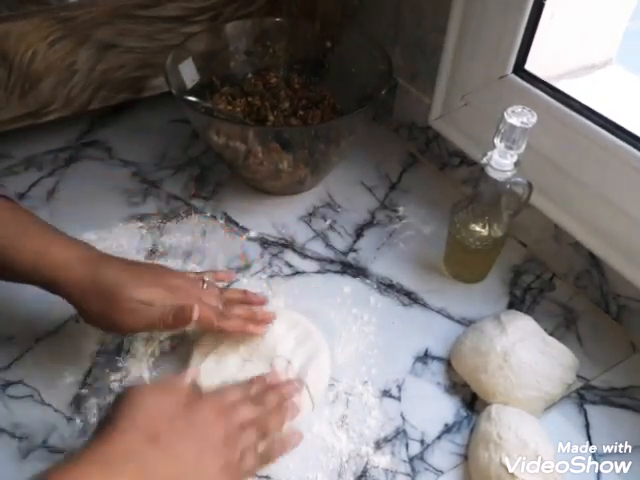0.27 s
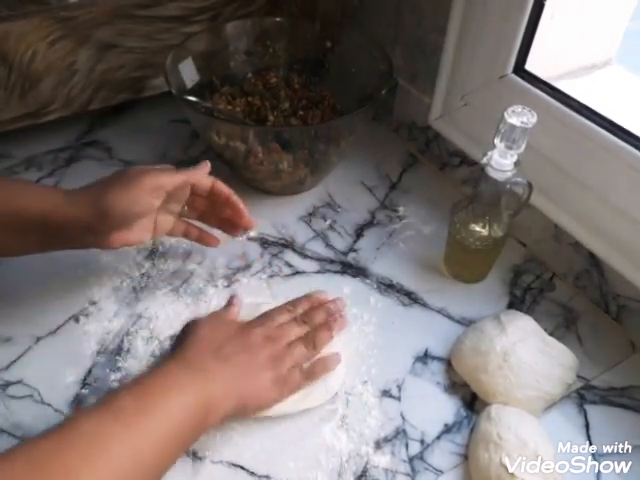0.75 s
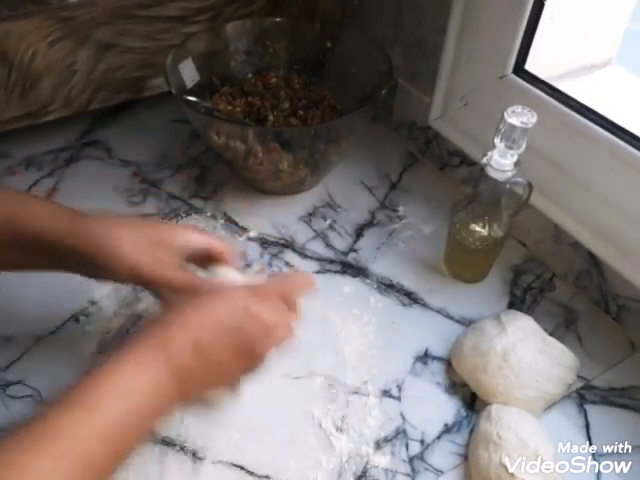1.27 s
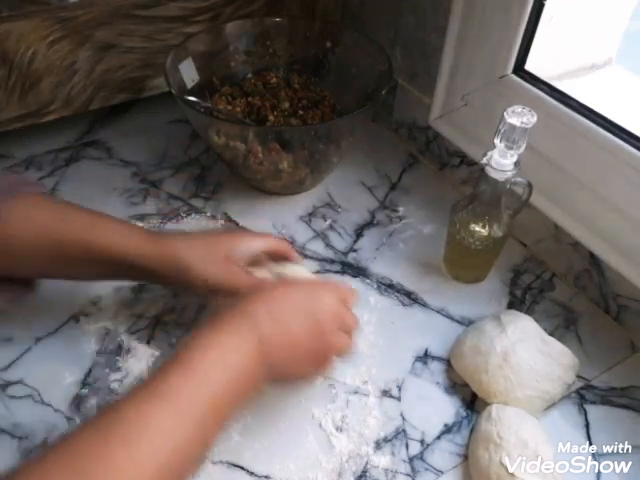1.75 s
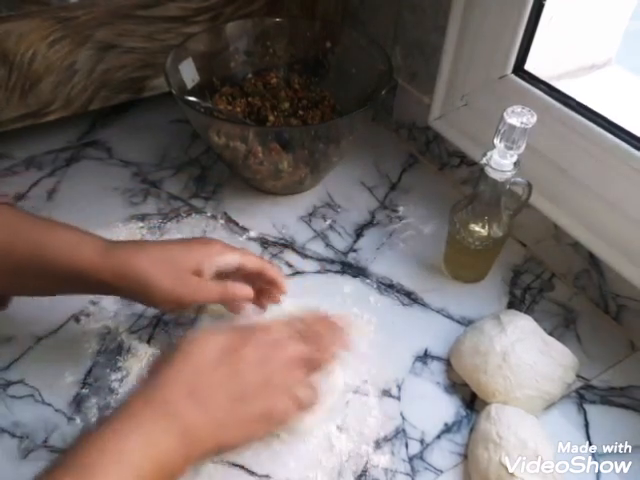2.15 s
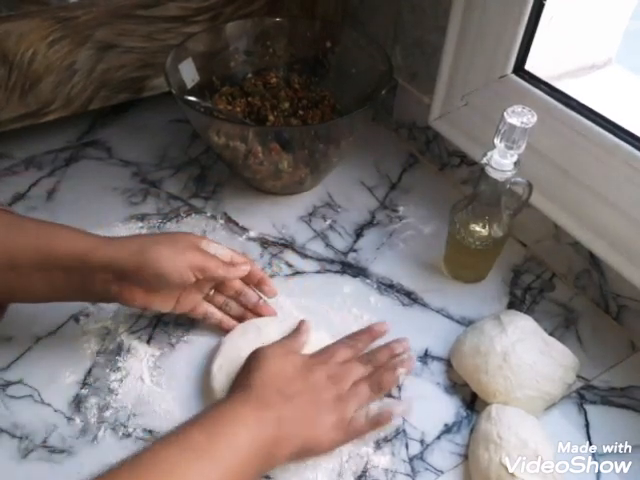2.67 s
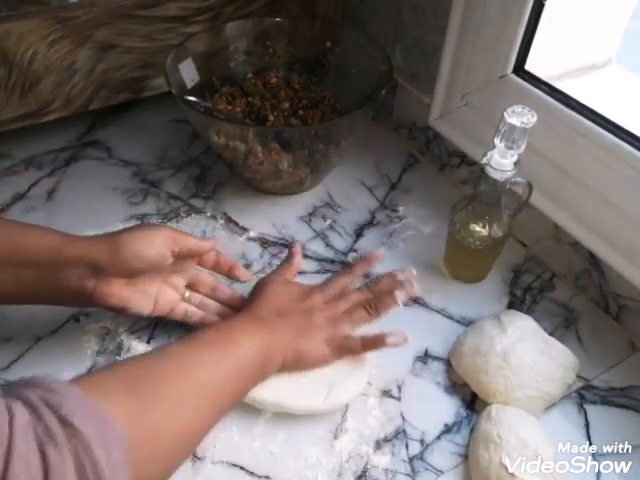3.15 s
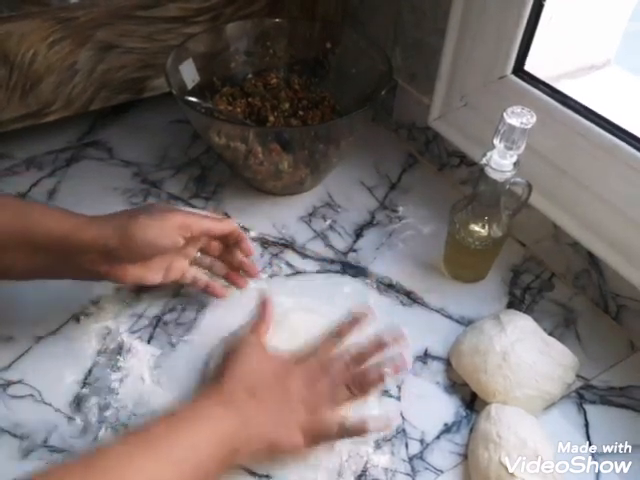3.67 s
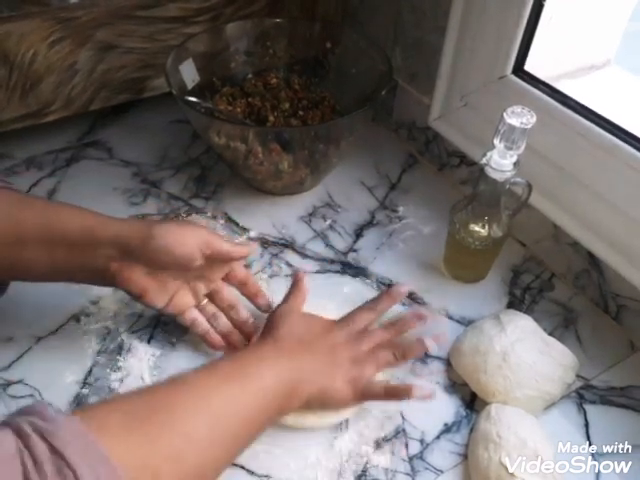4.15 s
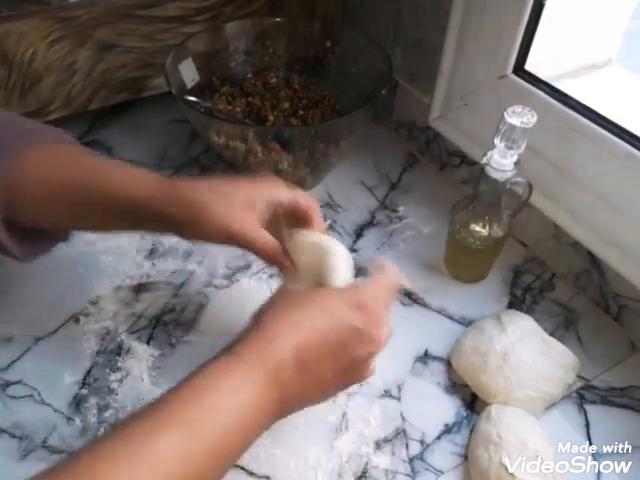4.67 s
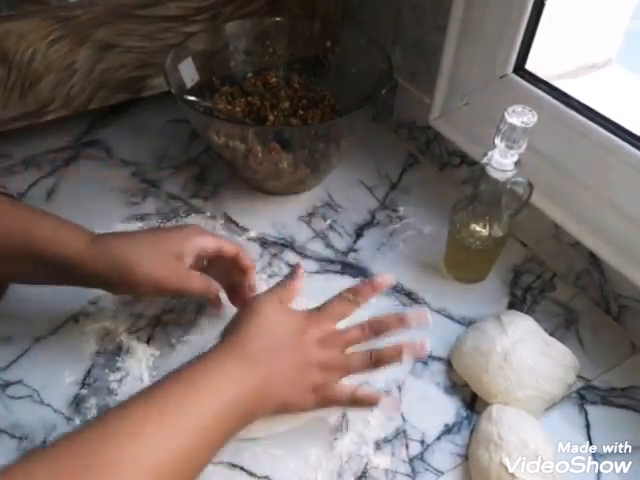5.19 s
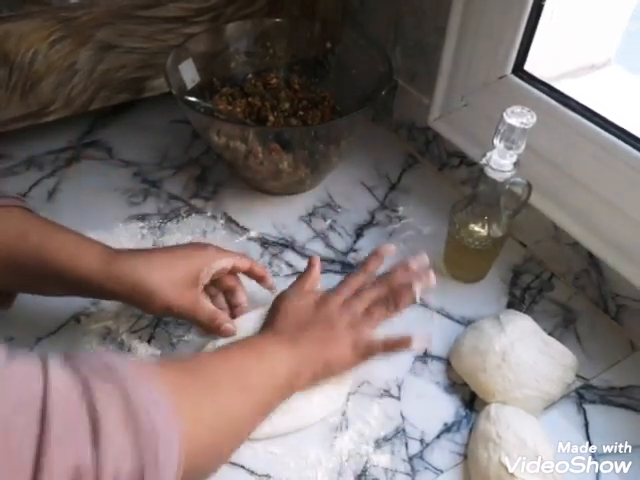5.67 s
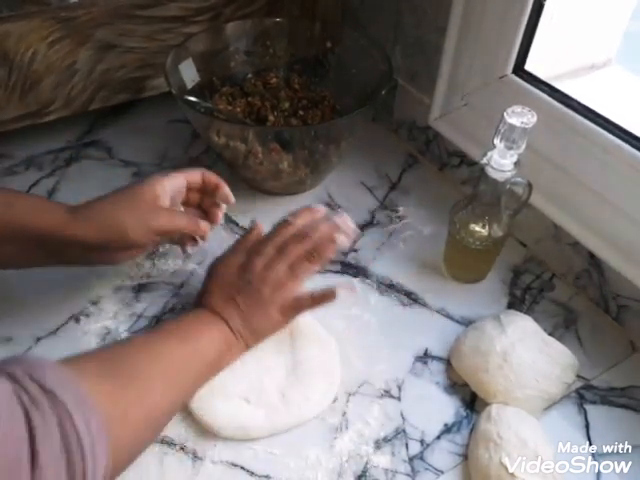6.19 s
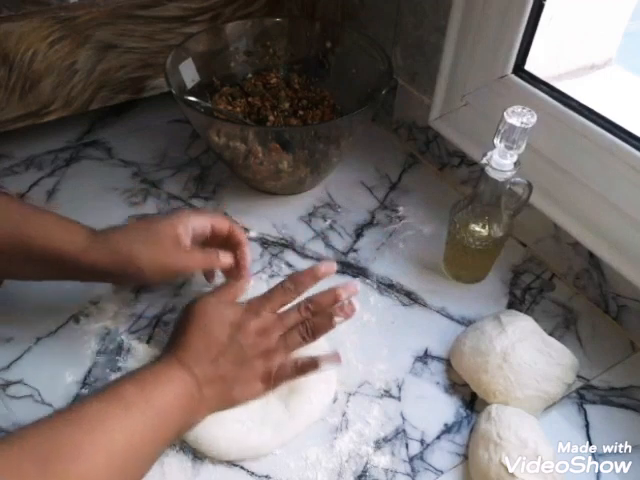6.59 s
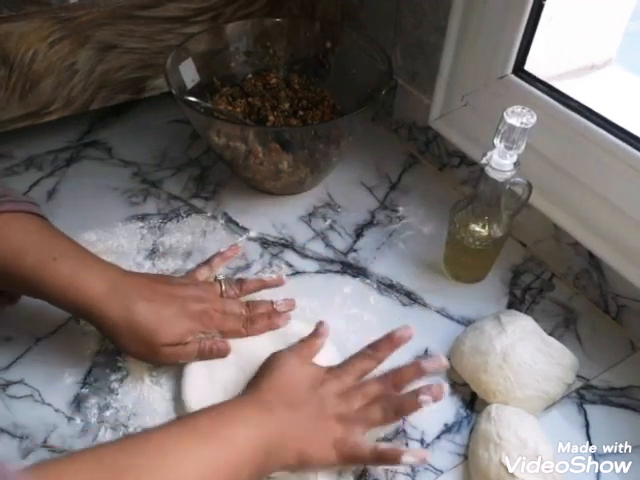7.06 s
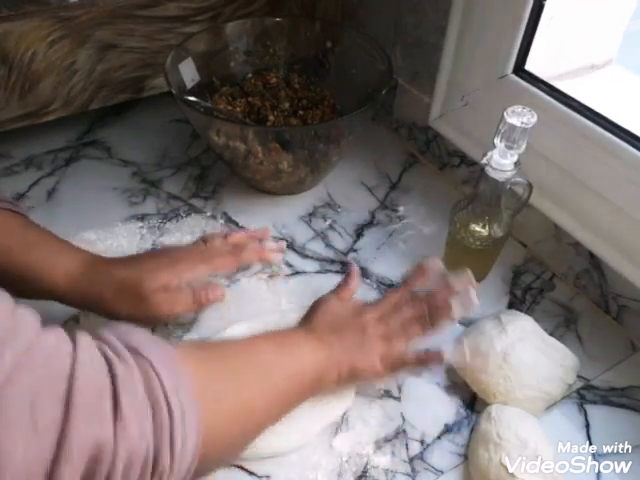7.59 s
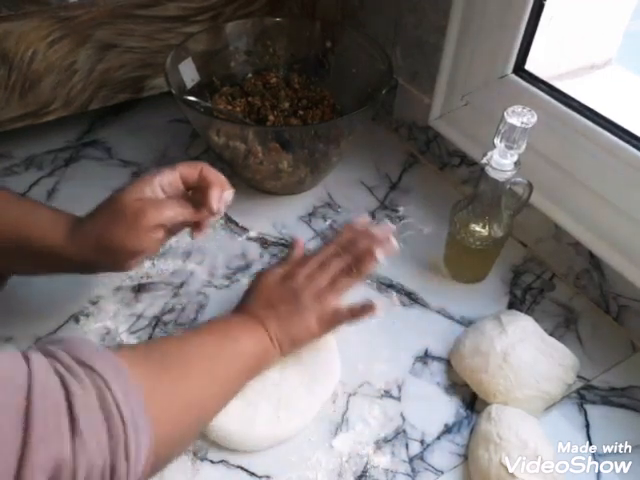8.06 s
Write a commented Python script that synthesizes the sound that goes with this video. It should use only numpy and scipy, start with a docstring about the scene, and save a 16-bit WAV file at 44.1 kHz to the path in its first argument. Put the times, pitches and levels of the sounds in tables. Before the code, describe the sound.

Hands pat soft dough on a floured stone counter, close in front of the microphone. A few light pats and a soft sliding hiss lead into a quick run of slaps, each a hollow pop with a smack of skin and a dull thud. A second run ends in another loud slap, then only gentle taps and rubbing remain. The kitchen echoes over a quiet low hum.

```python
"""Two hands pat, turn and slap soft dough flat on a floured stone counter in an echoing kitchen.
Each pat squeezes out a pocket of air that pops, the skin smacks and the counter thuds;
between pats, palms and dough slide over the flour with a fine hiss. The hands work almost
straight ahead of the microphones, with hard surfaces close by and a quiet hum behind."""
import sys
import numpy as np
from scipy import signal
from scipy.fft import rfft, irfft, next_fast_len
from scipy.io import wavfile
from scipy.ndimage import uniform_filter1d

SR = 44100
rng = np.random.default_rng(int(sys.argv[2]) if len(sys.argv) > 2 else 0)


def digitize_waveform(pressure):
    """Quantize a signal to 16-bit integers and store it at the path in sys.argv[1].

    Rows of a 2-D input are taken as channels; values are limited to [-1, 1].
    """
    field = np.atleast_2d(pressure).T
    bounded = np.clip(field, -1, 1)
    quanta = np.round(bounded * 32767).astype(np.int16)
    wavfile.write(sys.argv[1], SR, quanta)


N = 367353
TIME = np.arange(N) / SR
BLOW_T = np.arange(-1024, 3072) / SR   # seconds around one contact
BLOW_HZ = np.maximum(np.fft.rfftfreq(len(BLOW_T), 1 / SR), 1)

# Fingertips on the dough: time_s, pocket_db, contact_ms, pocket_hz, smack_hz, smack_db (against pocket)
FINGERTIP_TAPS = [ (0.075, -11, 6, 765, 1600, -0.5), (0.2603, -24.5, 7, 760, 2240, 5),
                  (0.4621, -13.5, 5, 776, 1600, 3.5), (0.4755, -13.5, 5, 786, 1930, 7),
                  (2.1491, -20.5, 5, 730, 1080, 1), (3.498, -9, 3, 570, 1440, -6),
                  (4.2038, -3.5, 4, 680, 1510, -4.5), (4.526, -24, 5, 457, 1560, -3.5),
                  (4.9962, -6.5, 3.5, 845, 1314, 0), (5.63, -8.5, 5, 367, 2100, -13.5),
                  (6.3961, -11, 5, 820, 1660, -2), (6.8672, -17, 11, 748, 1630, -4),
                  (7.07, -18.5, 6, 402, 1210, -12), (7.079, -21, 11, 805, 3660, -7),
                  (7.3025, -17, 6, 775, 3000, -2.5), (7.5205, -22, 9, 774, 2640, -1),
                  (7.755, -28, 9, 806, 1800, 7), (7.961, -32, 4, 700, 4000, 9),
                  (8.0075, -14.5, 5, 640, 1336, -4.5), (8.188, -21, 4, 452, 4900, 1)]
# Palms on the dough: time_s, pocket_db, contact_ms, lead_share, pocket_hz, pocket_q, smack_hz, smack_q,
# smack_db, crack_db (both against the pocket), thud_db, room_send_db
PALM_SLAPS = [ (0.6488, -3.5, 4.2, .55, 720, 1.4, 2950, 3, 2.5, -6.5, -8, 1),
              (0.8462, -1.5, 6.4, .65, 920, 1.4, 2050, 2.6, 5.5, -2.5, -1, -3.3),
              (2.2985, -1, 6.5, .6, 680, 2.8, 5730, 2.6, 1, -18, -6, -0.5),
              (2.538, 0, 5.2, .55, 700, 1.4, 1850, 3, -1.5, -5.5, -2, -2),
              (2.7513, 2, 3.2, .15, 820, 5, 3090, 1.6, 7.5, -13.5, -2.5, -3),
              (2.9630, -2.5, 7.5, .55, 720, 1.3, 3250, 2, -1.5, -12, -3, -2.3),
              (3.17, -11.5, 9, .6, 750, 1.6, 2150, 4, 6.5, -6, -9, 0.5),
              (3.3868, 6.5, 6.5, .5, 530, 2.2, 870, 2.3, -24, -24.5, -3, -2.5),
              (3.5855, 24.8, 2.9, .45, 540, 2.5, 2900, 1.8, -9.5, -18.7, 5.5, -1.2),
              (3.9802, 12, 3.9, .62, 584, 2.5, 1520, 5, -4.5, -16.3, 2.5, -1.5),
              (5.0007, 3.5, 2.5, .45, 900, 0.95, 1420, 1.4, 1, -25, -4, -1),
              (5.3095, 8.2, 3.2, .5, 810, 3.5, 2120, 6, 0.5, -18.5, 0.5, -0.5),
              (5.6221, 3, 7.5, .6, 610, 1.9, 1850, 4, -5.5, -35, 4.5, -3.5),
              (5.8996, 23, 1.1, .45, 698, 2, 1810, 1.9, -7, -18, 8, -3.4)]


def from_db(db):
    """Decibels to gain."""
    return 10 ** (np.asarray(db) / 20)


def rms_one(x):
    """Scale to unit rms."""
    return x / np.sqrt(np.mean(x ** 2) + 1e-20)


def at_hz(points, hz):
    """Read a table on a log-frequency axis."""
    points = np.array(points)
    return np.interp(np.log(np.maximum(hz, 1)), np.log(points[:, 0]), points[:, 1])


def colour(x, spectrum):
    """Give a signal a spectrum; rms 1."""
    size = next_fast_len(x.shape[-1])
    gain = from_db(at_hz(spectrum, np.fft.rfftfreq(size, 1 / SR)))
    return rms_one(irfft(rfft(x, size) * gain, size)[..., :x.shape[-1]])


def drift(per_s):
    """A random wander between knots of spread 1."""
    knots = rng.standard_normal(4000)
    return np.interp(TIME * per_s, np.arange(len(knots)), knots)


def add(out, sound, s):
    """Mix a sound in at a time."""
    start = int(round(s * SR))
    out[start:start + len(sound)] += sound[:N - start]


def swell(s, db, length_s, fall_share, roundness=1.7):
    """Power of one sliding movement, which speeds up and slows down; roundness 2 is a bell."""
    fall = np.clip(fall_share, .03, .97)
    power, near = np.zeros(N), np.abs(TIME - s) < 4 * length_s
    away = np.maximum((s - TIME[near]) / (1 - fall), (TIME[near] - s) / fall) / length_s
    power[near] = from_db(db) ** 2 * np.exp(-2 * away ** roundness)
    return power


def hollow(white, hz, q=4.5):
    """Hiss ringing in the hollow under a sliding hand; rms 1."""
    return rms_one(signal.lfilter(*signal.iirpeak(hz, q, fs=SR), white))


def flour(spectrum, grain_spread_db=2.5):
    """Countless grains slip under the skin, a few of them larger; rms 1."""
    grains = rng.standard_normal(N) * from_db(grain_spread_db * rng.standard_normal(N))
    return colour(grains, spectrum)


def rubbing(rustle_db=-80, judder_db=2, brush_db=-61.5):
    """Strokes, landing hands and fidgeting move the flour; more weight gives a brighter hiss."""
    # Slides over the flour: fastest_s, level_db, length_s, weight_share, slowing_share, hollow_hz,
    # hollow_db (against the hiss)
    strokes = [ (0.076, -64.5, 0.14, 0.9, 0.41, 3700, -3), (0.472, -60, 0.11, 0.5, 0.85, 4470, -5),
               (0.841, -48.5, 0.018, 0, .46, 2100, -18), (1.143, -62, 0.068, 0.9, 0.9, 4600, -11),
               (1.243, -62, .13, 0.83, 0.32, 5500, -21), (1.326, -62, 0.081, 0.77, 0.47, 4500, -16),
               (1.524, -64, .035, .6, 0.95, 4000, -27), (1.579, -61, 0.07, 0.44, 0.49, 4430, -24),
               (1.71, -54.3, 0.12, 0.86, 0.48, 3160, -10.5), (1.812, -50.5, 0.17, 0.81, 0.48, 2820, -7),
               (1.975, -61, 0.16, 0.35, 0.27, 3930, -9), (2.079, -68, 0.027, 0.8, 0.56, 4500, -18),
               (2.555, -45.5, .01, 0.76, 0.58, 7000, -12), (3.12, -57.5, 0.071, 0.27, 0.61, 4200, -14),
               (3.322, -64, 0.033, 0.4, .4, 5500, -4), (3.39, -59, 0.035, 0.6, 0.41, 4430, -14),
               (4.21, -54, 0.033, 0.5, 0.36, 5500, -8), (4.335, -65.5, 0.035, 0.7, .5, 4500, -15),
               (4.631, -62.5, 0.13, 0.8, 0.41, 4970, -9), (4.709, -59, 0.081, .9, 0.53, 5540, -6.5),
               (4.991, -60.5, 0.011, .05, 0.4, 1400, -1), (5.048, -63, 0.083, 0.4, .46, 4000, 0),
               (5.808, -55.5, 0.051, 0.66, 0.21, 5030, -10), (6.298, -51, 0.026, 0.3, 0.55, 4500, -15),
               (6.401, -56.5, 0.037, .8, 0.74, 4500, -6), (6.535, -64, 0.023, 0.6, 0.48, 4960, -3.5),
               (6.643, -62, .04, .8, .4, 4700, -10.5), (6.869, -57, 0.052, 0.86, 0.69, 4200, -9),
               (7.013, -66, 0.041, 0.56, .5, 3800, -6), (7.082, -63.5, .04, .5, 0.65, 3800, -2),
               (7.227, -59.3, 0.048, 0.87, 0.26, 4280, 2), (7.43, -65, 0.077, .6, 0.32, 4200, -3),
               (7.463, -55.5, 0.032, 0.85, .35, 4560, -6), (7.654, -64, .025, .6, .4, 6000, -3),
               (7.704, -60, 0.041, 1, 0.54, 5500, -2), (7.84, -69, .06, .8, .5, 5500, -4),
               (7.935, -69, 0.049, .4, .5, 3730, -0.5), (8.196, -59, 0.041, 0.75, 0.59, 5660, 0.5),
               (8.264, -63.5, .049, .94, .46, 5000, -7)]
    # Faint stirring between strokes: time_s, level_db
    fidgets = [(0, -75), (0.38, -85), (1.2, -87), (2.3, -80.5), (3.2, -70.5), (4.3, -79), (4.9, -90.5),
               (5.7, -70.5), (6.8, -76.5), (7.4, -69), (8.33, -74.5)]
    # Flour under a light touch: frequency_hz, density_db
    light_rub = [(300, -23), (750, -1.5), (1050, 2), (1500, 7), (2000, -9.5), (2500, -0.5), (3100, -4),
                 (4200, 5), (7000, 1), (10000, -7), (13000, -14), (16000, -13)]
    # Flour under the sliding dough: frequency_hz, density_db
    heavy_rub = [(300, -35), (700, -14), (1300, -2), (2300, 2.5), (3100, -6), (4500, 0.5), (7000, 4),
                 (10000, 1.5), (13000, 3.5), (15000, -3.5), (16000, -19.5)]
    # Hands and sleeves, never quite at rest: frequency_hz, density_db
    rustle = [(600, -13), (1500, 4), (4000, -5.5), (8000, -2.5), (13000, -5), (16000, -10.5)]
    white, ringing = rng.standard_normal(N), np.zeros(N)
    moves = []   # power, weight
    for s, db, length_s, weight, fall_share, hollow_hz, hollow_db in strokes:
        power = swell(s, db, length_s, fall_share)
        moves.append((power, weight))
        ringing += np.sqrt(power) * from_db(hollow_db) * hollow(white, hollow_hz)
    for s, db, *_ in PALM_SLAPS + FINGERTIP_TAPS:   # a harder landing brushes more flour aside
        moves.append((swell(s, brush_db + 0.72 * db, length_s=.022, fall_share=.82), .5))
    fidget_db = np.interp(TIME, *np.transpose(fidgets)) + 1.2 * drift(per_s=18)
    moves.append((from_db(fidget_db) ** 2, 0.19))
    light = np.sqrt(sum(power * (1 - weight) for power, weight in moves)) * flour(light_rub)
    heavy = np.sqrt(sum(power * weight for power, weight in moves)) * flour(heavy_rub)
    hiss = light + heavy + ringing + from_db(rustle_db) * flour(rustle)
    return hiss * from_db(judder_db * drift(per_s=98))


def shifting_gaps(hiss, spread_db=1.7):
    """The gaps under a moving hand keep changing shape, so narrow colours come and go in the hiss."""
    cells = signal.stft(hiss, nperseg=256)[2]
    across_pitch = uniform_filter1d(rng.standard_normal(cells.shape), size=3, axis=0)
    patches = rms_one(uniform_filter1d(across_pitch, size=20, axis=1))
    return signal.istft(cells * from_db(spread_db * patches))[1][:N]


def soften(top_hz):
    """Power response of soft flesh, which swallows what lies above a limit."""
    return 1 / (1 + ((BLOW_HZ / top_hz) ** 2) ** 2)


def resonance(hz, db, q):
    """Power spectrum of a damped resonance that peaks at db."""
    return from_db(db) ** 2 / (1 + (q * (BLOW_HZ / hz - hz / BLOW_HZ)) ** 2)


def air_pocket(hz, db, q):
    """Power spectrum of trapped air popping out from under the hand."""
    return resonance(hz, db, q) * soften(1.9 * hz)


def smack(hz, db, q):
    """Power spectrum of skin smacking on dough."""
    return resonance(hz, db, q) * soften(0.94 * hz)


def crack(db):
    """Power spectrum of the broad crack of first contact."""
    # Skin's first contact: frequency_hz, density_db
    spectrum = [(30, -20), (100, -2.5), (300, -1), (1200, -14.5), (3000, 0), (6000, -6.5), (9000, -11.5),
                (12500, -25), (16000, -42)]
    return from_db(db + at_hz(spectrum, BLOW_HZ)) ** 2


def thud(db):
    """Power spectrum of dough pushed against the counter."""
    # Dough on stone: frequency_hz, density_db
    spectrum = [(30, -27), (60, -10), (92, -10), (135, 6.5), (180, 1.5), (240, -14), (315, -8.5),
                (450, -24.5), (1000, -61)]
    return from_db(db + at_hz(spectrum, BLOW_HZ)) ** 2


def causal_pulse(power):
    """The promptest pulse that has this power spectrum (minimum phase)."""
    cepstrum = irfft(np.log(power + 1e-14) / 2)
    half = len(cepstrum) // 2
    cepstrum[1:half] *= 2
    cepstrum[half + 1:] = 0
    return irfft(np.exp(rfft(cepstrum)))


def sink(pulse, lag_ms=3, below_hz=628):
    """Yielding dough holds back the low part of a pulse, so each pop glides down."""
    lag_s = lag_ms / 1000 * soften(below_hz)
    turns = (lag_s.sum() - np.cumsum(lag_s)) * SR / len(pulse)
    return irfft(rfft(pulse) * np.exp(2j * np.pi * turns))[:len(pulse) // 2]


def patter(contact_ms, lead, seal=0.3):
    """Skin lands patch by patch as the palm seals; lead is the build-up's share of the contact."""
    age = BLOW_T / (contact_ms / 1000)
    envelope = np.exp(-np.where(age < 0, (age / lead) ** 2, age))
    contacts = rng.standard_normal(len(BLOW_T)) * envelope
    spectrum = rfft(contacts / np.linalg.norm(contacts) + seal * (BLOW_T == 0))
    contacts = irfft(spectrum / np.abs(spectrum) ** .7) * np.sqrt(envelope)   # only a mild ripple stays
    return contacts / np.linalg.norm(contacts)


def scatter(spread_ms=12):
    """Arms and counter smear a blow in time on its way into the room without colouring it."""
    smear = patter(spread_ms, lead=.05)
    window = (BLOW_T >= 0) & (BLOW_T < 3 * spread_ms / 1000)
    for _ in range(24):   # flatten the spectrum, keep the smear short
        smear = irfft(np.exp(1j * np.angle(rfft(smear)))) * window
    return smear / np.linalg.norm(smear)


def blow(s, power, contact_ms, room_db, lead=0.6):
    """One blow in two rows: what goes straight to the microphones and what goes into the room."""
    out = np.zeros((2, N))
    pulse = sink(causal_pulse(power * (1 - soften(top_hz=79))))   # a hand radiates no deep bass
    add(out[0], signal.fftconvolve(pulse, patter(contact_ms, lead)), s + BLOW_T[0])
    add(out[1], from_db(room_db) * signal.fftconvolve(pulse, scatter()), s + BLOW_T[0])
    return out


def taps(q=3.6, crack_db=-11, thud_db=-5.5):
    """Fingertips land lightly, each trapping a small pocket of air."""
    out = np.zeros((2, N))
    for s, db, contact_ms, pocket_hz, smack_hz, smack_db in FINGERTIP_TAPS:
        fingertip = air_pocket(pocket_hz, db, q) + smack(smack_hz, db + smack_db, q)
        impact = crack(db + smack_db + crack_db) + thud(db + thud_db)
        out += blow(s, fingertip + impact, contact_ms, room_db=0.3)
    return out


def flops():
    """Dough falling on the counter only thuds."""
    # The dough lands: time_s, level_db
    landings = [(0.464, -3.5), (0.477, -4), (0.581, -11), (0.65, 4.5), (0.724, -10), (0.848, -3),
                (1.132, -5.5), (1.16, -17.5), (1.565, -12.5), (2.148, -13.5)]
    return sum(blow(s, thud(db), contact_ms=14, room_db=0) for s, db in landings)


def slaps():
    """The palm comes down: the skin cracks, the trapped air pops and the counter thuds."""
    out = np.zeros((2, N))
    for (s, db, contact_ms, lead, pocket_hz, pocket_q, smack_hz, smack_q,
         smack_db, crack_db, thud_db, room_db) in PALM_SLAPS:
        palm = air_pocket(pocket_hz, db, pocket_q) + smack(smack_hz, db + smack_db, smack_q)
        out += blow(s, palm + thud(thud_db), contact_ms, room_db, lead)
        crack_ms = 0.94 + 0.62 * contact_ms
        out += blow(s, crack(db + crack_db), crack_ms, room_db + 1, lead)
    return out


def finger_pops(q=10, contact_ms=1.6):
    """Each small pocket between fingers and dough rings briefly at one hollow pitch."""
    # Air under the fingers as a hand lands: time_s, level_db, pitch_hz, room_send_db
    pockets = [ (0.649, -3, 930, -5), (0.6489, -1, 2350, -6), (0.8462, 7, 2200, -11),
               (0.8468, -1, 2480, -3), (0.8457, 2, 930, -8), (2.2985, -4, 1000, 1), (2.2992, -1, 4400, -4),
               (2.5382, 4, 950, -8), (2.5374, -2, 2250, -4), (2.5366, -4, 4650, -4), (2.7512, 11, 2430, -7),
               (2.7522, 6, 1950, -4), (2.7516, 4.5, 3820, -1), (2.9652, -4, 2000, 2), (2.9635, -6, 2520, 0),
               (3.1705, -12, 4100, 0), (3.3865, -13, 1700, 2), (3.3855, -14, 2350, 2),
               (3.5857, 21, 860, -5), (3.5865, 13, 1330, -2), (3.5862, 11, 1650, -1), (3.981, 3, 3200, -10),
               (5.001, 8, 900, -7), (5.0009, 6, 1220, -4), (5.0005, -7, 2780, -2), (5.3098, 2, 1050, -1),
               (5.6225, -6, 2200, 2), (5.622, -14, 4200, 0), (5.8997, 14, 1100, -4), (7.302, -14, 2480, 6),
               (7.304, -18, 1550, 5), (7.305, -18, 4200, 4), (7.757, -23, 1420, 4), (7.769, -23, 1950, 1),
               (8.02, -21, 1000, 1)]
    return sum(blow(s, air_pocket(hz, db, q), contact_ms, room_db) for s, db, hz, room_db in pockets)


def near_echoes(x):
    """Counter, window and walls throw the blow straight back at the microphones."""
    # Hard surfaces close by: delay_s, level_db
    echoes = [(0.00225, -13), (0.0104, -15.5), (0.0228, -16), (0.0341, -22.5)]
    index = np.arange(N)
    return x + sum(from_db(db) * np.interp(index - round(s * SR), index, x, left=0) for s, db in echoes)


def standing_waves(t):
    """The room's strongest modes, each a dying sine."""
    # Kitchen modes: pitch_hz, peak_db, t60_s
    modes = [(178, 12.5, 1.4), (315, 4.5, 1.2), (440, 8, 0.9), (629, 8, 1.3), (694, 3.5, 1.3)]
    ringing = np.zeros(len(t))
    for hz, db, t60 in modes:
        amplitude = from_db(db) * 2 * np.log(1000) / (t60 * SR)   # gives a gain of db at resonance
        ringing += amplitude * np.sin(2 * np.pi * hz * t) * from_db(-60 * t / t60)
    return ringing


def kitchen(x, build_s=0.0011):
    """The room answers with standing waves and a diffuse tail in which each band dies at its own rate."""
    # Decay of the tail: frequency_hz, t60_s
    decay_times = [(80, 1.05), (180, 1.1), (430, 1.15), (560, 1.4), (700, 1.35), (1000, 1.1), (1600, 1.08),
                   (2400, 1.12), (5000, 1.02), (9000, .82), (15000, .6)]
    # Strength of the tail: frequency_hz, gain_db
    tail_levels = [(60, 0.5), (115, 0.5), (150, 1.5), (185, 6.5), (245, -6.5), (420, 0), (700, -4.5),
                   (1200, -3.5), (2400, -3), (4000, -4), (7000, -6.5), (15000, -10)]
    t = np.arange(SR * 3 // 2) / SR
    hz, white = np.fft.rfftfreq(len(t), 1 / SR), rfft(rng.standard_normal(len(t)))
    centres = np.geomspace(50, 16000, 32)
    onset = 1 - np.exp(-(t / build_s) ** 2)
    tail = np.zeros(len(t))
    for centre, selector in zip(centres, np.eye(len(centres))):
        share = np.interp(hz, centres, selector)
        band = irfft(white * share, len(t)) * from_db(-60 * t / at_hz(decay_times, centre)) * onset
        band *= np.sqrt(np.mean(share ** 2) / np.sum(band ** 2))   # same energy whatever the decay
        tail += band * from_db(at_hz(tail_levels, centre))
    return signal.fftconvolve(x, tail + standing_waves(t))[:N]


def room_tone(level_db=-70.5):
    """A quiet, low hum lies behind the hands."""
    # Background hum: frequency_hz, density_db
    spectrum = [(20, -43.5), (45, -11), (65, 4), (85, 5.5), (125, 8), (170, -3.5), (260, -12), (450, -9),
                (900, -12), (2000, -27), (5000, -36), (15000, -36.5)]
    return from_db(level_db) * colour(rng.standard_normal(N), spectrum)


def microphone_noise(level_db=-72):
    """Each microphone adds its own noise, which gives most of the stereo width."""
    # Self-noise: frequency_hz, density_db
    spectrum = [(15, -32), (25, -4.5), (136, -2.5), (359, -3), (762, -3.5), (2230, -6.5), (3000, -6),
                (4500, -0.5), (13500, -5), (15500, -7.5)]
    return from_db(level_db) * colour(rng.standard_normal((2, N)), spectrum)


def scene(rub_room_db=-6, pan_db=0.14):
    """The hands at the counter, almost straight ahead of the microphones, with the kitchen around."""
    direct, radiated = slaps() + finger_pops() + taps() + flops()
    hiss = shifting_gaps(rubbing())
    background = room_tone() + microphone_noise()
    close = near_echoes(direct) * from_db([[pan_db], [-pan_db]])
    room = kitchen(radiated + from_db(rub_room_db) * hiss)
    return close + hiss + room + background


def record(dry):
    """The top is cut steeply above 15.8 kHz."""
    return signal.sosfilt(signal.ellip(10, .1, 80, 15800, fs=SR, output="sos"), dry)


dry = scene()
out = record(dry)
digitize_waveform(out)
```